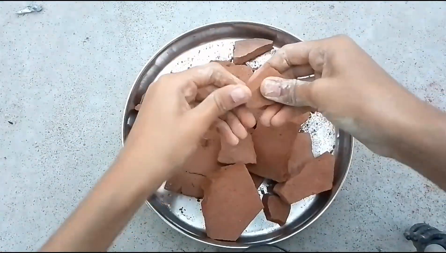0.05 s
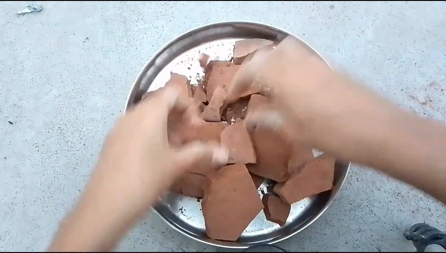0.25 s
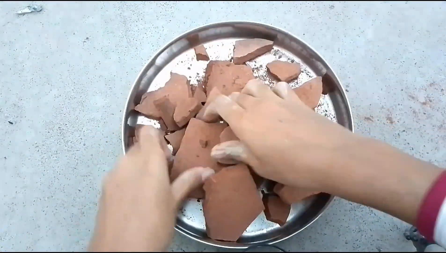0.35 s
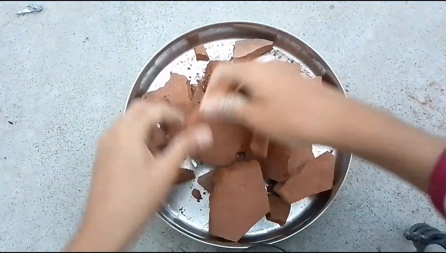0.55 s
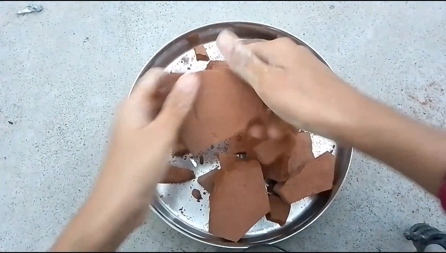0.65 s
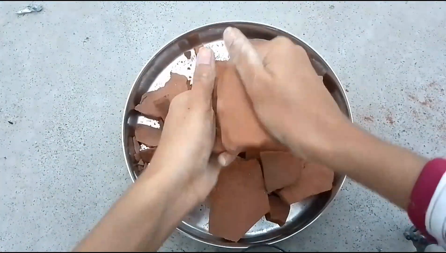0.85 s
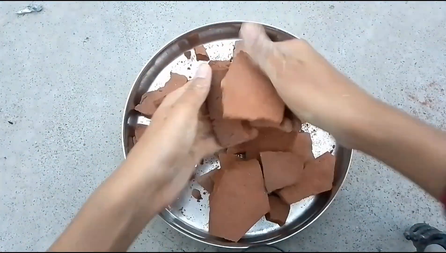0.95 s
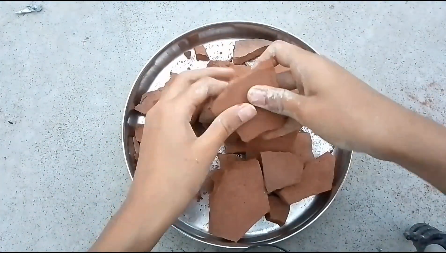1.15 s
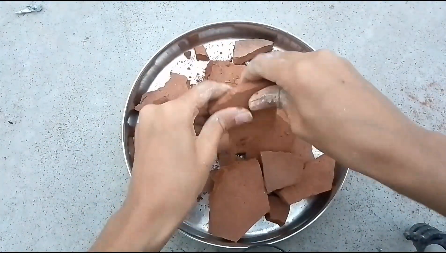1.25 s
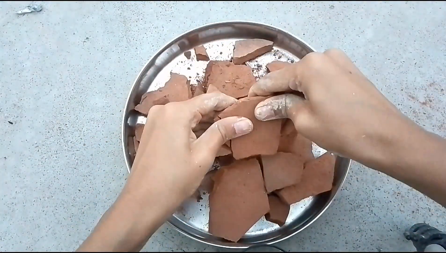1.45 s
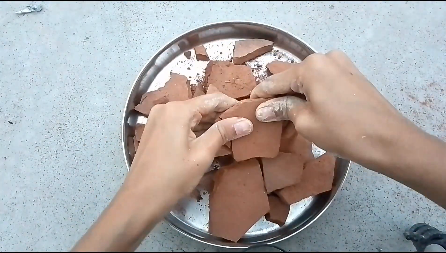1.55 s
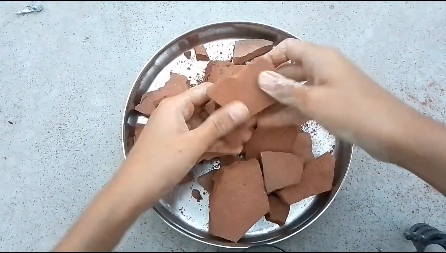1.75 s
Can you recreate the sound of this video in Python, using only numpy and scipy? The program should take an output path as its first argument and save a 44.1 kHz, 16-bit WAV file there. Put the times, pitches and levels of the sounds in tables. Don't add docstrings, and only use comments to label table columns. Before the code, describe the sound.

Clay shards knock dully in a steel bowl, heard close over low room murmur and soft hand rumble. Light clacks at the start, a sharp one at 0.2 s, then a dense hard cluster at 0.38-0.48 s with gritty grinding until 0.7 s. A faint scrape sinks in pitch at 0.6-0.8 s. Near quiet follows; knocks at 1.2 s, strong clacks and scraping at 1.36-1.45 s, faint metal hum, then slight rubbing.

```python
import sys
import numpy as np
from scipy import signal
from scipy.fft import rfft, irfft
from scipy.io import wavfile
from scipy.ndimage import uniform_filter1d

SR = 44100
rng = np.random.default_rng(int(sys.argv[2]) if len(sys.argv) > 2 else 0)


def wrap_up_sound(samples):
    columns = np.atleast_2d(samples).T
    tamed = np.clip(columns, -1, 1)
    steps = np.round(tamed * 32767).astype(np.int16)
    wavfile.write(sys.argv[1], SR, steps)


def ratio(d):
    e = np.asarray(d, float) / 20
    return 10 ** e


N = 79380

# (pitch [Hz], level [dB], time to fall 60 dB [s])
LOW_MODES = [(1250, -6, .018), (1350, -2, .022), (1470, 0, .022), (1630, -6, .016)]
# (pitch [Hz], level [dB], time to fall 60 dB [s])
MID_MODES = [(1980, 0, .022), (2250, -3, .018), (2450, -2, .02), (2630, -4, .018), (2810, -6, .015),
             (3010, -11, .012)]


def rms_one(x):
    return x / np.sqrt(np.mean(x ** 2) + 1e-20)


def top_one(x):
    return x / np.sqrt(uniform_filter1d(x ** 2, size=180).max() + 1e-20)


def in_time(rows):
    s, *columns = np.transpose(rows)
    return [np.interp(np.arange(N) / SR, s, c) for c in columns]


def coloured(x, spectrum):
    hz, db = np.transpose(spectrum)
    axis = np.log(np.fft.rfftfreq(len(x), 1 / SR) + 1)
    gain = ratio(np.interp(axis, np.log(hz), db, left=-90))
    return irfft(rfft(x) * gain, len(x))


def drift(rate):
    r = np.exp(-2 * np.pi * rate / SR)
    noise = rng.standard_normal(N + 9000)
    return rms_one(signal.lfilter([1], [1, -2 * r, r * r], noise)[9000:])


def ring(x, hz, t60):
    r = ratio(-60 / (t60 * SR))
    w = 2 * np.pi * hz / SR
    return signal.lfilter([0, np.sin(w)], [1, -2 * r * np.cos(w), r * r], x + 1e-18)


def contacts(count, rate, spread_db):
    chance, force, sign = rng.random((3, count))
    strength = ratio(-spread_db * np.log(force + 0.0098))
    return (chance < rate / SR) * strength * np.sign(sign - .5)


def body(x):
    return signal.sosfilt(signal.butter(4, [1130, 3300], "band", fs=SR, output="sos"), x)


def room():
    # (frequency [Hz], level [dB per Hz])
    room_tone = [(25, -5.5), (55, -7.5), (100, -2.5), (165, -17), (480, -11), (800, -6.5), (1800, -29),
                 (4000, -33), (15000, -36)]
    level_db = -68.5 + 4.0 * drift(9.1)
    return ratio(level_db) * rms_one(coloured(rng.standard_normal(N), room_tone))


def rumble():
    # (time [s], level [dB])
    rumble_level = [
        (0, -67),
        (.2, -64),
        (.36, -61),
        (.7, -65.5),
        (.96, -64),
        (1.08, -76),
        (1.4, -61),
        (1.57, -63),
        (1.66, -74),
        (1.8, -60),
    ]
    band = signal.butter(3, [210, 365], "band", fs=SR, output="sos")
    noise = rms_one(signal.sosfilt(band, rng.standard_normal(N)))
    return ratio(in_time(rumble_level)[0] + 2.5 * drift(15)) * noise


def crumbs(clicks, spectrum):
    pitches = [3700, 4700, 5000, 5600, 6300, 7000, 7700, 8700, 9500, 10200, 11500, 12900]
    dealt = rng.integers(0, len(pitches), len(clicks))
    rings = np.zeros(len(clicks))
    for k, hz in enumerate(pitches):
        patches = ratio(6 * drift(9))
        t60 = 90 / hz
        rings += ring(clicks * (dealt == k), hz, t60) * np.sqrt(hz) * patches
    mix = ratio(5) * rms_one(rings) + rms_one(clicks)
    top = signal.butter(8, 15300, fs=SR, output="sos")
    return rms_one(signal.sosfilt(top, coloured(mix, spectrum)))


def rubbing():
    # (time [s], body level [dB], dust level [dB])
    rub_level = [
        (0, -59, -102),
        (.3, -67.5, -104),
        (.45, -43.5, -66),
        (.66, -43, -67),
        (.75, -61.5, -77.5),
        (1.0, -67.5, -94.5),
        (1.65, -71.5, -101),
        (1.8, -61.5, -97.5),
    ]
    # (time [s], length [s])
    slides = [(.02, .06), (.118, .055), (.225, .05), (.378, .035), (.442, .035), (.488, .04), (.542, .026),
              (.575, .03), (.607, .055), (.665, .05), (.72, .014), (.825, .075), (1.192, .045), (1.32, .04),
              (1.361, .047), (1.415, .034), (1.45, .04), (1.699, .04)]
    # (body level [dB], treble level [dB])
    slide_levels = [(-53, -74.5), (-50.5, -72), (-72, -87), (-50.5, -59), (-44, -62), (-49.5, -62.5),
                    (-48.5, -65.5), (-49, -68), (-48, -57), (-68, -64.5), (-81, -64), (-51.5, -70),
                    (-51.5, -72), (-54, -71.5), (-36.5, -67.5), (-29.5, -58), (-57.5, -83.5), (-66, -70.5)]
    # (frequency [Hz], level [dB per Hz])
    dust_tone = [(2120, -9.5), (3600, -1), (4940, -2), (9930, -3.5), (11500, -6.5), (13200, -6.5),
                 (15000, -5)]
    contacts_per_s, edge_s, sag_db = 2500, .005, 6
    t = np.arange(N) / SR

    body_gain, dust_gain = ratio(in_time(rub_level))
    for (s, length), (body_db, dust_db) in zip(slides, slide_levels):
        gate = np.clip(np.minimum(2 * (t - s), s + length - t) / edge_s + .5, 0, 1)
        gate = gate * ratio(-sag_db * np.clip((t - s) / length - .5, -1, 1))
        body_gain = body_gain + gate * ratio(body_db)
        dust_gain = dust_gain + gate * ratio(dust_db)

    clumps = ratio(-2.5 * drift(60))
    grit = contacts(N, contacts_per_s, 1) * clumps

    def rubbed(modes):
        rings = sum(ratio(db + 7.8 * drift(23)) * ring(grit, hz, 0.18 * t60) for hz, db, t60 in modes)
        return rms_one(body(rings))

    shards = ratio(-13.5) * rubbed(LOW_MODES) + ratio(-14) * rubbed(MID_MODES)
    specks = contacts(N, 3.3 * contacts_per_s, 2.2) * clumps * ratio(2.2 * drift(150))
    return body_gain * shards + dust_gain * crumbs(specks, dust_tone)


def struck_modes(s):
    # (time [s], low pitch [Hz], second pitch [Hz], third pitch [Hz], fourth pitch [Hz])
    hit_shards = [(.0104, 1180, 2154, 2000, 2780), (.2144, 1494, 1996, 2420, 2625),
                  (.3795, 1500, 2010, 2650, 2160), (.3864, 1380, 1990, 2200, 2500),
                  (.4189, 1511, 2302, 2020, 2624), (.4254, 1493, 2374, 2820, 2010),
                  (.4394, 1408, 2015, 2590, 3040), (.4808, 1360, 2630, 1900, 2500),
                  (.6115, 1507, 2630, 3200, 2260), (.8155, 1550, 3070, 2670, 2170),
                  (1.1812, 1250, 1990, 2740, 2453), (1.37, 1360, 1930, 2510, 2240),
                  (1.4124, 1496, 2000, 2400, 2040), (1.4341, 1250, 1950, 2430, 2085),
                  (1.5439, 1210, 2470, 2700, 2960)]
    # (third level [dB], fourth level [dB])
    upper_levels = [(-10, -25), (0.5, -14.5), (-8.5, -7.5), (-0.5, -3.5), (-2, 0.5), (-3, -4.5),
                    (-1.5, -12), (-5, -8), (-8, -10), (-2, -11), (-6.5, -5), (-1.5, -7), (-7, -1.5),
                    (-1, 2), (-12, -9)]
    t60 = 0.014

    def dim(modes, low_hz):
        return [(hz, db - 15, fall) for hz, db, fall in modes if hz > .9 * low_hz]

    for (at, low_hz, *mid_hz), rest_db in zip(hit_shards, upper_levels):
        if abs(at - s) < .003:
            low = dim(LOW_MODES, low_hz) + [(low_hz, 0, t60)]
            own = [(hz, db, t60) for hz, db in zip(mid_hz, (0, *rest_db))]
            return low, dim(MID_MODES, low_hz) + own
    return LOW_MODES, MID_MODES


def knocks(table):
    # (frequency [Hz], level [dB per Hz])
    grit_tone = [(2240, -26), (3800, 8.5), (4650, 13), (5460, 9.5), (10100, -4.5), (12300, -3),
                 (15000, -14.5)]
    foretouch_s, lead_s = .003, .0012
    out = np.zeros(N + SR)
    t = np.arange(SR // 8) / SR - foretouch_s
    age = np.maximum(t, 0)

    def swell(fade):
        rise = 1 - np.exp(-(age / (.4 * fade)) ** 2)
        fall = np.exp(-age / fade) + ratio(-43) * np.exp(-age / 0.026)
        return ratio(-33) * (t < 0) + rise * fall

    def struck(push, modes):
        rings = np.zeros(len(t))
        for hz, db, t60 in modes:
            strength = ratio(db + 1.8 * rng.standard_normal())
            rings += strength * ring(push, hz * (1 + .01 * rng.uniform(-1, 1)), t60)
        return top_one(body(rings))

    for s, mid_db, low_db, high_db, fade in table:
        burst = contacts(len(t), 3000, 3.) + 0.86 * rng.standard_normal(len(t))
        push = burst * swell(fade)
        low_modes, mid_modes = struck_modes(s)
        low, mid = struck(push, low_modes), struck(push, mid_modes)
        high = top_one(coloured(burst, grit_tone) * swell(1.4 * fade) ** 0.87)
        start = int((s - lead_s - foretouch_s) * SR)
        out[start:start + len(t)] += ratio(low_db - 5.5) * low + ratio(mid_db) * mid + ratio(high_db - 9.0) * high
    return out[:N]


def hard_knocks():
    # (time [s], middle level [dB], low level [dB], treble level [dB], fade [s])
    hard = [(.0104, -35.5, -38.5, -50.5, 0.0043), (.0608, -49, -49, -88, 0.004),
            (.1351, -44, -45, -54, 0.0014), (.153, -67, -35, -85, 0.0014), (.1584, -58, -39, -82, 0.002),
            (.2144, -22.5, -17.5, -35.5, 0.0031), (.3416, -51, -38, -51, 0.0029),
            (.3795, -23.5, -18, -27, 0.0023), (.3864, -35, -22, -35.5, 0.0038),
            (.4189, -18, -18, -31, 0.0035), (.4254, -25.5, -22, -28.5, 0.0012),
            (.4394, -26.5, -29.5, -29.5, 0.0016), (.4808, -36, -39, -36.5, 0.0042),
            (.6115, -41, -45, -43.5, 0.0033), (.8155, -41, -37.5, -39.5, 0.0015),
            (1.1812, -34, -39.5, -34.5, 0.0038), (1.1864, -35, -35.5, -36.5, 0.0018),
            (1.2204, -60, -40, -66, 0.0017), (1.3700, -35, -28.5, -42, 0.0028),
            (1.4124, -26.5, -20.5, -34, 0.0051), (1.4224, -40, -27, -47, 0.0033),
            (1.4341, -22.5, -23.5, -39, 0.0028), (1.4424, -34, -28, -39.5, 0.0018),
            (1.5439, -44.5, -61, -52.5, 0.0012)]
    return knocks(hard)


def thuds():
    # (time [s], pitch [Hz], level [dB], time to fall 60 dB [s])
    landings = [(0.013, 824, -50.5, 0.022), (.343, 714, -60, 0.028), (0.482, 693, -49.5, 0.033),
                (.652, 814, -52, 0.031), (.379, 623, -37.5, 0.01), (.420, 625, -38, 0.037),
                (.421, 1010, -45, 0.012), (0.439, 555.4, -33, 0.0088), (1.181, 642, -52, 0.031),
                (1.221, 890, -39, 0.0076), (1.313, 877, -51.5, 0.018), (1.412, 526, -38, 0.028),
                (1.413, 997, -28, 0.014), (1.434, 744, -27.5, 0.0094), (1.546, 281, -57, 0.053),
                (0.216, 287, -61, 0.055), (.380, 288, -51, 0.038), (0.422, 289, -55, 0.024),
                (1.182, 294.4, -60, 0.0346), (1.371, 710, -52, .03), (1.427, 786, -41.5, 0.024),
                (.825, 250, -69, .15), (.932, 255, -61, 0.13), (0.956, 232, -65.5, 0.24),
                (.692, 953, -54.5, 0.031), (.816, 674, -64, 0.033)]
    out, t = np.zeros(N), np.arange(N) / SR
    for s, hz, db, t60 in landings:
        age = np.maximum(t - s + 0.00189, 0)
        fall = ratio(db + 12.0 - 60 * age / t60)
        rise = 1 - np.exp(-(age / 0.0012) ** 2)
        out += fall * rise * np.sin(2 * np.pi * hz * age)
    return out


def ticks():
    start_s, period_s, pair_s = .0285, .042, .0165
    out = np.zeros(N + SR)
    first = np.arange(start_s, N / SR, period_s)
    first = first + rng.uniform(-.001, .001, len(first))
    for s in (first, first + pair_s):
        out[(s * SR).astype(int)] = ratio(-58 + rng.normal(0, 1, len(s)))
    return signal.sosfilt(signal.butter(2, 4000, "high", fs=SR, output="sos"), out[:N])


def light_touches():
    # (time [s], middle level [dB], low level [dB], treble level [dB], fade [s])
    light = [(.0571, -48, -47, -83.5, .0018), (.1058, -53, -49, -90, .0021), (.376, -44, -38, -55, .002),
             (.4155, -44, -40, -58, .002), (.5476, -52, -50, -58, .006), (.589, -50, -39, -58, .0016),
             (.6314, -47, -46, -47, .006), (.6501, -55, -42, -57, .0043), (.6934, -54, -52, -55, .002),
             (.7058, -50, -66, -58, .004), (.7256, -55.5, -64, -52.5, .0026), (.7656, -65, -64, -63, .003),
             (.9419, -52, -65, -50.5, .0021), (1.2064, -54, -53, -62, .0052),
             (1.2308, -50, -50, -62, .0015), (1.3125, -62, -43, -56.5, .0029),
             (1.3625, -43, -44, -50, .004), (1.3795, -45, -46, -52, .003),
             (1.3896, -47.5, -52.5, -49.5, .0034), (1.403, -52, -48, -62, .004),
             (1.428, -43, -37, -52, .002), (1.6995, -66, -64, -68, .002), (1.714, -61, -72, -78, .008)]
    return knocks(light)


def drag():
    # (time [s], pitch [Hz], level [dB])
    song = [
        (.57, 1349, -90),
        (.59, 1320, -52),
        (.64, 1200, -58),
        (.67, 843, -58),
        (.70, 767, -60.5),
        (.73, 727, -65.5),
        (.78, 681, -63),
        (.83, 668, -75),
        (.86, 660, -95),
    ]
    width_hz = 45
    hz, db = in_time(song)
    phase = 2 * np.pi * np.cumsum(hz) / SR
    return ratio(db) * (drift(width_hz) * np.sin(phase) + drift(width_hz) * np.cos(phase))


def bowl():
    hum_pitches = [2650, 790, 1230, 2760, 2400, 6300, 2800]
    # (time [s], level [dB], time to fall 60 dB [s])
    nudges = [
        (.855, -59, .2),
        (1.505, -52, .3),
        (1.548, -66, .25),
        (1.56, -77, .8),
        (1.313, -64, .8),
        (1.205, -64, .08),
        (1.2, -66, .4),
    ]
    out, t = np.zeros(N), np.arange(N) / SR
    for hz, (s, db, t60) in zip(hum_pitches, nudges):
        age = np.maximum(t - s, 0)
        fall = ratio(db - 60 * age / t60 + 6 * drift(60))
        rise = 1 - np.exp(-age / 0.0037)
        out += fall * rise * np.sin(2 * np.pi * hz * age)
    return out


def scene():
    background = room() + rumble()
    shards = rubbing() + hard_knocks() + thuds() + light_touches() + drag()
    return (background + shards + bowl())[None]


def low_pass(x):
    return signal.sosfilt(signal.butter(12, 15770, fs=SR, output="sos"), x)


def record(dry):
    mic = signal.butter(6, 13800, fs=SR, output="sos")
    mix = signal.sosfilt(mic, dry + ticks())
    return low_pass(mix)


dry = scene()
out = record(dry)
wrap_up_sound(out)
```